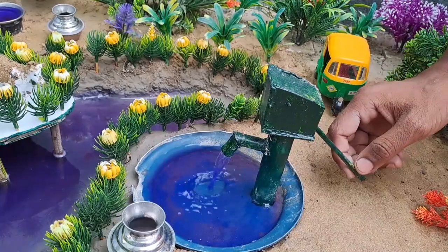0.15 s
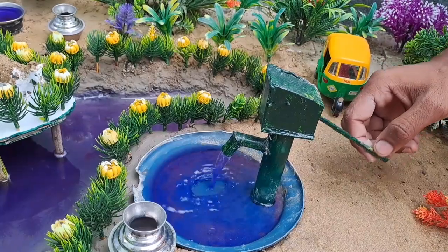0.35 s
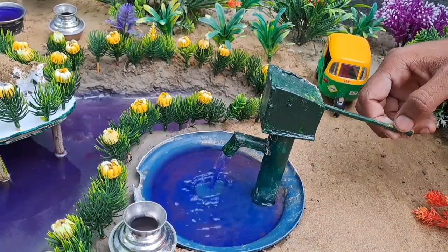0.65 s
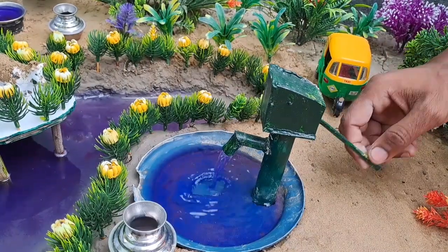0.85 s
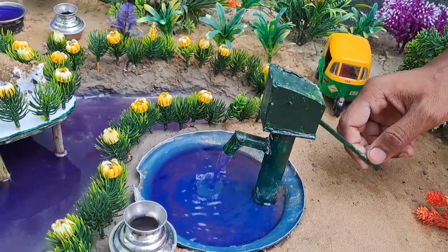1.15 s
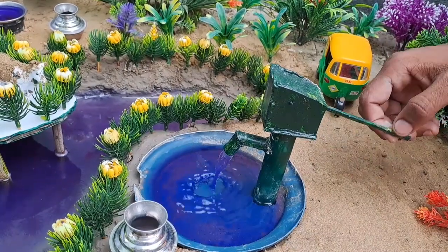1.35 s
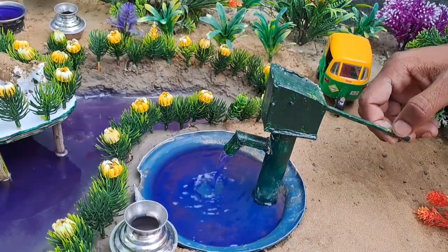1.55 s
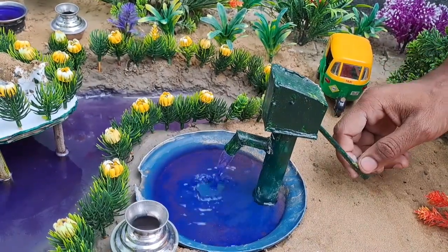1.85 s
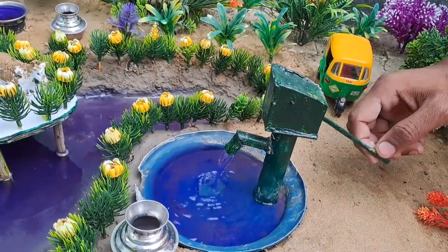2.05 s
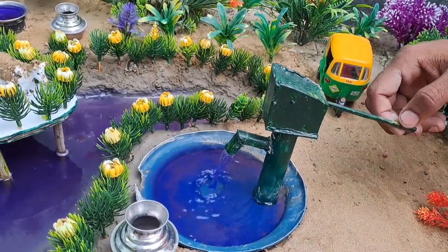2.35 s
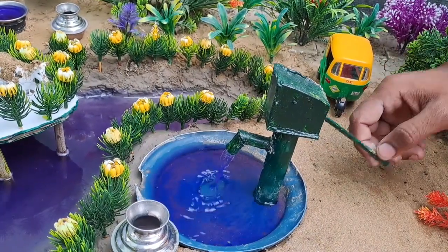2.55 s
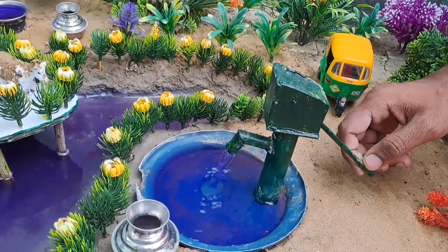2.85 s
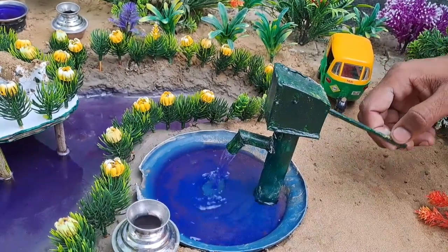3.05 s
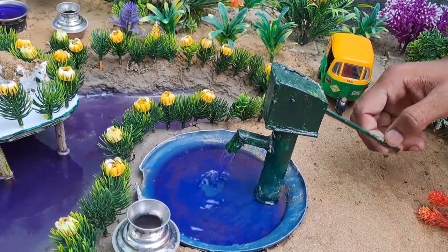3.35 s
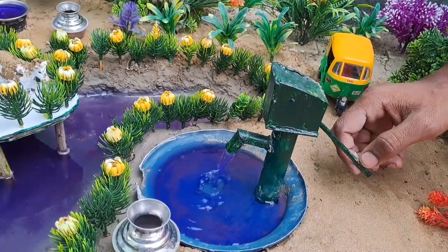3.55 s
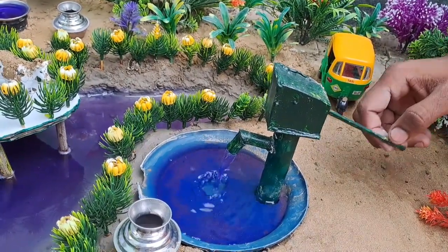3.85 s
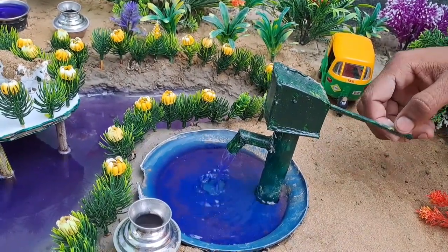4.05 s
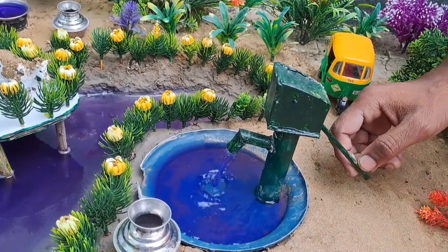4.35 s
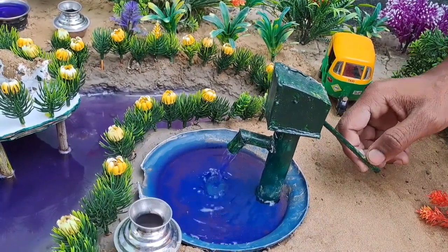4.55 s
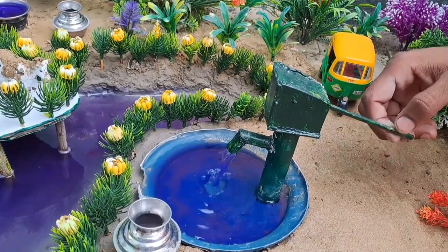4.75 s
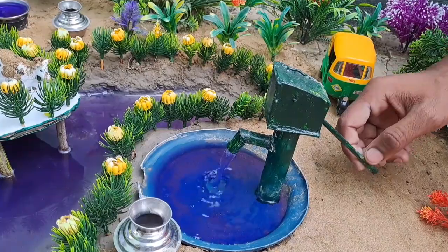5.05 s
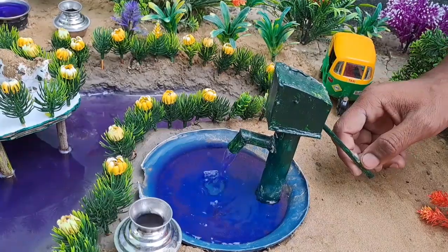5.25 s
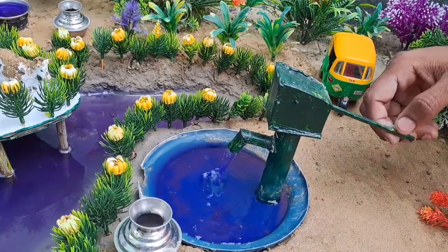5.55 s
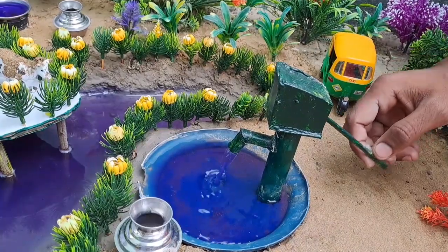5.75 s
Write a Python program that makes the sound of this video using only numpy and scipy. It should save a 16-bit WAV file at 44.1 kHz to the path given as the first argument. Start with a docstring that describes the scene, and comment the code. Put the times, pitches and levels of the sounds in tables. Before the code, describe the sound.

Close mono sound of a miniature hand pump spurting into a shallow basin of water. Roughly every second a quick gush lands with a dense, bright splash, a short basin ring and a low hollow gurgle, then thins to dribbling and burbling. Faint chirps, single fat drops and dull bumps appear. Near the end the sound drops out for an instant, then two harder, louder strokes follow.

```python
"""At a shallow basin, close by, in mono: a small hand pump spurts water about once a second.
Each stroke is noise clicks and bubble tones, filtered into a dense splash, a basin ring and a low hollow.
It thins to a dribble, over soft burbling, low rumble and bumps, with thin chirps and fat single drops.
The sound cuts out for a moment before the last two strokes, which are harder."""
import sys
import numpy as np
from scipy import signal
from scipy.fft import rfft, irfft
from scipy.io import wavfile
from scipy.ndimage import uniform_filter1d, map_coordinates

SR = 44100
rng = np.random.default_rng(int(sys.argv[2]) if len(sys.argv) > 2 else 0)


def inscribe(sig):
    """Save sig as 16-bit PCM at rate SR to the path in sys.argv[1].

    A 1-D sig is mono; a 2-D sig holds one channel per row.
    Samples are clipped to [-1, 1] before scaling.
    """
    pcm = np.round(np.clip(np.atleast_2d(sig).T, -1, 1) * 32767)
    wavfile.write(sys.argv[1], SR, pcm.astype(np.int16))


N = 260631
TIME = np.arange(N) / SR
BINS = np.fft.rfftfreq(16384, 1 / SR)

# All table levels are relative: each layer is balanced further on.
# Strokes of the handle, the first already under way: (t/s, gush level/dB, gush hold/s, dribble level/dB,
# spray slap level/dB, basin ring level/dB, hollow gurgle level/dB, hollow opening time/s)
PUMP_STROKES = [(-.55, -24.5, .045, -32, -25, -26, -21.5, .04),
                (0.386, -20, 0.041, -33.5, -21, -29.5, -28.5, 0.017),
                (1.282, -21, 0.043, -32.5, -24.5, -29, -27.5, 0.022),
                (2.223, -19.5, 0.045, -32, -22, -27.5, -27.5, 0.02),
                (3.179, -22, 0.092, -32, -24.5, -28, -27.5, 0.078),
                (4.131, -21.5, .045, -35.5, -24.5, -30, -29.5, .04),
                (4.765, -18.5, 0.15, -27.5, -17.5, -25, -22, 0.054),
                (5.6, -17, 0.098, -33.5, -23.5, -26, -21.5, 0.021)]
# Lumps of water that break out of the stream: (start t/s, time to peak/s, splash level/dB, spray level/dB)
WATER_SLUGS = [(.09, .01, -30.5, -45), (.465, 0.013, -27.5, -32), (.515, .012, -28.5, -31.5),
               (.628, .013, -28.5, -35), (1.195, .025, -39.5, -56), (1.345, .014, -22.5, -36),
               (1.504, 0.026, -27.5, -34.5), (1.93, 0.014, -39.5, -43), (2.193, .007, -39, -33),
               (2.367, .012, -24, -41), (2.453, .014, -25.5, -32), (2.644, .02, -30.5, -54),
               (2.737, .009, -30, -34), (3.144, 0.012, -36.5, -36.5), (3.428, .017, -24.5, -33),
               (3.572, 0.022, -28.5, -44), (3.733, 0.016, -28.5, -41), (4.078, .012, -39, -37),
               (4.358, 0.015, -29.5, -39), (4.527, 0.013, -30, -46.5), (4.791, 0.023, -18, -23.5),
               (4.821, 0.02, -15.5, -27.5), (4.901, 0.017, -22, -25), (5.025, 0.036, -25, -32),
               (5.152, 0.008, -24.5, -36), (5.313, 0.034, -24.5, -34), (5.371, 0.027, -24, -35.5),
               (5.644, .016, -13.5, -23), (5.729, .016, -21, -32), (5.87, .012, -32.5, -30.5)]
# Gulps of trapped air that set the basin ringing: (peak t/s, level/dB)
AIR_GULPS = [(.03, -38), (.105, -45), (.19, -35), (.495, -21), (.678, -27), (.868, -35), (.94, -36),
             (1.038, -34.5), (1.375, -29), (1.585, -29), (1.8, -29), (1.945, -41), (2.384, -25.5),
             (2.869, -32.5), (3.235, -28), (3.593, -29), (3.755, -30.5), (4.236, -22.5), (4.416, -24),
             (4.857, -14), (5.065, -25), (5.168, -31), (5.37, -26.5), (5.433, -26), (5.667, -14)]
# Deep glugs of the hollow: (peak t/s, half length/s, level/dB)
HOLLOW_GLUGS = [(.44, 0.033, -23.5), (.515, 0.02, -25), (.72, 0.014, -27.5), (1.248, 0.047, -31.5),
                (1.675, 0.013, -22), (2.275, .02, -29), (2.335, 0.022, -39), (2.45, .028, -31.5),
                (2.792, .025, -34), (3.298, 0.034, -23.5), (3.377, 0.031, -26), (3.55, .025, -30),
                (3.635, 0.038, -36), (4.117, 0.017, -26), (4.245, 0.029, -24.5), (4.55, .025, -33),
                (4.84, 0.021, -23), (4.955, 0.022, -24), (5.197, 0.021, -22.5), (5.865, 0.014, -20)]
# Wall resonances of the basin: (f/Hz, width/Hz, lift on easy strokes/dB, lift on hard strokes/dB)
BASIN_WALLS = [(793, 200, 12, 21.5), (1195, 13, 3, 18.5), (1328, 44, -2.5, 12.5), (1805, 13, 12, -23),
               (2087, 93, 0.5, 7), (2210, 61, 7.5, 12.5), (2332, 45, 5.5, 8.5), (2570, 33, 10.5, -10),
               (2930, 11, 13, -44), (3467, 70, 1.5, 7), (4694, 81, 4, 10)]
# The basin's main ring: (f/Hz, width/Hz, level/dB)
BASIN_RING = [(1488.4, 74, 3.5), (1462, 140, 9.5), (1620, 85, 2)]
# The basin's low body: (f/Hz, width/Hz, level/dB)
BASIN_BODY = [(311.6, 40, -9), (451.4, 80, 0.5), (535, 51, -3.5)]
# The hollow under the stream: (f/Hz, width/Hz, level/dB)
HOLLOW_MODES = [(238.4, 23.8, -3), (291, 130, -18.5)]
# Colour of the splash: (f/Hz, level/dB)
SPLASH_COLOUR = [(300, -28), (650, -24.5), (1000, -11), (1300, -8), (1800, -1), (2650, 1.5), (3300, 0),
                 (4500, -4), (5500, -7.5), (6500, -15), (8500, -17), (16000, -25.5)]
# Colour of the spray: (f/Hz, level/dB)
SPRAY_COLOUR = [(2500, -34), (5000, 5.5), (6600, 4), (7900, -1), (8600, -5.5), (11000, -5), (12400, -1.5),
                (13800, -10), (15500, -20.5), (16500, -18)]
# Extra top end of the spray when single drops fall: (f/Hz, level/dB)
CRISP_LIFT = [(4000, -17.5), (8000, -7.5), (12000, -6), (14500, 4.5), (16000, 8.5)]
# Colour of the rumble and the bumps: (f/Hz, level/dB)
RUMBLE_COLOUR = [(15, -34.5), (30, -16), (48, 6), (90, 0), (130, -6.5), (190, -22), (300, -51.5)]
# Swell of the low rumble: (t/s, level/dB)
RUMBLE_SWELL = [(0, -52.5), (1.3, -49), (2.8, -54.5), (3.9, -45), (4.6, -46), (5.9, -35.5)]
# Dull bumps as the hand rocks the pump: (t/s, peak level/dB)
PUMP_BUMPS = [(0.128, -38), (0.53, -33), (0.657, -35), (1.349, -29.5), (2.298, -41), (3.142, -37),
              (3.79, -34.5), (4.279, -35), (4.86, -35), (5.366, -30), (5.779, -31), (5.875, -29)]
# Thin chirps at the pump: (t/s, level/dB, f/Hz, length/s, glide as a share of the pitch)
PUMP_CHIRPS = [(0.139, -28.5, 5260, 0.021, -0.03), (0.177, -35, 5170, 0.044, .03),
               (0.987, -40, 5000, 0.069, -0.042), (1.085, -48.5, 5400, 0.066, -0.043),
               (5.151, -21, 4694, 0.033, -0.0032), (5.421, -27.5, 8700, 0.017, -0.0024)]
# Fat drops and splats: (t/s, peak level/dB, decay/s)
FAT_DROPS = [(.142, -17.5, 0.0034), (.632, -30, 0.0058), (.835, -19, 0.0022), (1.903, -20, .0015),
             (2.913, -8, 0.0014), (3.002, -16, .002), (3.432, -14, 0.0034), (3.736, -15, 0.0092),
             (5.152, -9.5, 0.017)]
# Moment when the sound is cut out: (start t/s, end t/s)
DROPOUT = (4.633, 4.762)

# The gush sets in, holds and falls away; the dribble outlasts it until the spout runs dry.
ATTACK_S, GUSH_FALL_DB_PER_S = .007, 55.5
# The dry fall comes on top of the ordinary fall.
DRIBBLE_FALL_DB_PER_S, DRY_AFTER_S, DRY_FALL_DB_PER_S = 6, 0.73, 27.5
# Spray: a slap as the gush lands, then a mist that grows more slowly than the flow.
SLAP_ATTACK_S, SLAP_FALL_DB_PER_S = 0.0082, 199
MIST_DB, MIST_GROWTH = -40, 0.43  # level at the rms flow, exponent
# The basin's ring builds up under each gush and dies as the spout runs dry.
RING_RISE_S, RING_FALL_DB_PER_S, RING_DRY_DB_PER_S = 0.031, 16, 47.5
HOLLOW_FALL_DB_PER_S = 15  # the hollow slowly closes after each gush
GULP_HALF_S = .019
# The stream thins while each slug or gush gathers: time before it lands, half length, depth.
GATHER_S, GATHER_HALF_S, GATHER_DB = 0.0092, 0.015, -1.5
EDGE_HZ = 15600  # upper band limit


def amp(db):
    """Decibels to gain."""
    return 10 ** (np.asarray(db) / 20)


def evened(x):
    """Scales to rms 1."""
    return x / np.sqrt(np.mean(x ** 2) + 1e-20)


def steadied(x, seconds):
    """Holds the rms near 1 over the given time and leaves faster flutter alone."""
    size = max(int(seconds * SR), 2)
    power = uniform_filter1d(uniform_filter1d(x ** 2, size), size)
    return x / np.sqrt(abs(power) + 1e-12)


def level(curve):
    """A dB curve as a gain for every sample."""
    return amp(np.interp(TIME, *np.transpose(curve)))


def read(points):
    """A spectrum in dB on the frequency bins."""
    hz, db = np.transpose(points)
    return np.interp(np.log(BINS + 1), np.log(hz), db)


def peak(hz, width):
    """Power response of one resonance."""
    return 1 / (1 + (2 * (BINS - hz) / width) ** 2)


def resonances(modes):
    """Spectrum in dB of a few steep-sided resonances."""
    power = sum((amp(db) * peak(hz, width)) ** 2 for hz, width, db in modes)
    return 10 * np.log10(power)


def ring(x, db):
    """Causal, minimum-phase filter with the given spectrum: every click rings on after it lands."""
    log_gain = np.log(amp(np.maximum(db - db.max(), -90)))
    circle = np.concatenate([log_gain, log_gain[-2:0:-1]])
    response = np.fft.ifft(np.exp(np.conj(signal.hilbert(circle)))).real
    return signal.oaconvolve(x, response[:len(BINS) // 2])[:len(x)]


def wander(hz):
    """Smooth chance of rms 1, mostly slower than the given rate."""
    f = np.fft.rfftfreq(N, 1 / SR)
    spectrum = rfft(rng.standard_normal(N)) / (1 + (f / hz) ** 2)
    return evened(irfft(spectrum, N))


def add(mix, s, sound):
    """Adds a sound at a time."""
    part = mix[max(round(s * SR), 0):][:len(sound)]
    part += sound[:len(part)]


def slosh(x, depth_s, rate_hz):
    """Moving water bends a sound's pitch slightly up and down by a wandering delay."""
    warped = TIME + depth_s * wander(rate_hz)
    return map_coordinates(x, [warped * SR], order=3, mode="reflect")


def mottled(x, patchy_db, count, size):
    """Each little splash has its own colour: brief random patches of louder and softer pitch."""
    _, _, z = signal.stft(x, SR, nperseg=512, noverlap=384)
    patches = rng.standard_normal(z.shape[::-1])  # frames by bins
    patches = uniform_filter1d(patches, count, axis=0)
    patches = evened(uniform_filter1d(patches, size, axis=1)).T
    gain = evened(amp(patchy_db * patches))
    return signal.istft(z * gain, SR, nperseg=512, noverlap=384)[1][:N]


def drop_sizes(spread_db):
    """Random gains for every sample: mostly small, now and then large."""
    return amp(spread_db * np.minimum(rng.exponential(1, N), 4))


def spurt(start, db, attack_s, hold_s, fall_db_per_s, dry_db_per_s):
    """Power over one stroke: it rises, holds and falls, with an extra fall once the spout runs dry."""
    age = np.maximum(TIME - start, 0)
    fallen = fall_db_per_s * np.maximum(age - hold_s, 0)
    fallen = fallen + dry_db_per_s * np.maximum(age - DRY_AFTER_S, 0)
    return (np.minimum(age / attack_s, 1) * amp(db - np.minimum(fallen, 200))) ** 2


def swell(s, half_s, db):
    """Power of one brief, rounded surge."""
    return amp(db) ** 2 * np.exp(-np.minimum(((TIME - s) / half_s) ** 2, 100))


def slug(start, peak_s, db):
    """Power of a lump of water landing: a quick start and a softer end."""
    u = np.clip((TIME - start) / peak_s, 0, 10)
    return (amp(db) * u) ** 2 * np.exp(1 - u ** 2)


def pumping():
    """Gains of flow, spray, basin ring and hollow: powers of strokes, slugs, gulps and glugs add up."""
    flow, spray, ringing, gurgle = np.zeros((4, N))
    for s, gush_db, hold_s, dribble_db, slap_db, ring_db, gurgle_db, open_s in PUMP_STROKES:
        flow *= amp(GATHER_DB * swell(s - GATHER_S, GATHER_HALF_S, 0)) ** 2
        flow += spurt(s, gush_db, ATTACK_S, hold_s, GUSH_FALL_DB_PER_S, 0)
        flow += spurt(s, dribble_db, ATTACK_S, 0, DRIBBLE_FALL_DB_PER_S, DRY_FALL_DB_PER_S)
        spray += spurt(s, slap_db, SLAP_ATTACK_S, 0, SLAP_FALL_DB_PER_S, 0)
        ringing += spurt(s, ring_db, RING_RISE_S, 0, RING_FALL_DB_PER_S, RING_DRY_DB_PER_S)
        gurgle += spurt(s, gurgle_db, open_s, 0, HOLLOW_FALL_DB_PER_S, 0)
    gathering = sum(swell(s - GATHER_S, GATHER_HALF_S, 0) for s, *_ in WATER_SLUGS)
    flow *= amp(GATHER_DB * gathering) ** 2
    spray += (amp(MIST_DB) * evened(np.sqrt(flow)) ** MIST_GROWTH) ** 2
    for s, peak_s, splash_db, spray_db in WATER_SLUGS:
        flow += slug(s, peak_s, splash_db)
        spray += slug(s, peak_s, spray_db)
    ringing += sum(swell(s, GULP_HALF_S, db) for s, db in AIR_GULPS)
    gurgle += sum(swell(*glug) for glug in HOLLOW_GLUGS)
    return np.sqrt([flow, spray, ringing, gurgle])


def patter(per_s, spread_db, burst_s, mist):
    """Drops of random size land at random; each breaks into a burst of tiny clicks over a thin mist."""
    size = drop_sizes(spread_db) * (rng.random(N) < per_s / SR)
    power = signal.lfilter([1], [1, -np.exp(-1 / (burst_s * SR))], size ** 2)
    power = power / (uniform_filter1d(power, size=8000) + 1e-9)
    return np.sqrt(abs(power) + abs(mist)) * rng.standard_normal(N)


def froth(per_s, low_hz, high_hz, cycles, spread_db, count):
    """Bubbles of many sizes, each a short dying tone that rises in pitch."""
    born = np.flatnonzero(rng.random(N) < per_s / SR)
    size = drop_sizes(spread_db)[born]
    kind = rng.integers(0, count, N)[born]
    out = np.zeros(N)
    for k, hz in enumerate(np.geomspace(low_hz, high_hz, count)):
        age = np.arange(0, 5, hz / (cycles * SR))  # in decay times
        tone = np.sin(2 * np.pi * cycles * age * (1 + 0.018 * age))
        tone = tone * np.exp(-age) * np.sqrt(hz / low_hz)
        for at, height in zip(born[kind == k], size[kind == k]):
            add(out, at / SR, height * tone)
    return out


def splash(impacts, droplets, density):
    """Impacts and bubbles excite the basin walls; strokes after the dropout excite them harder."""
    bubbles = steadied(froth(1800 * density, 1075.4, 6600, cycles=8, spread_db=1.5, count=60), 0.16)
    drive = mottled(impacts + .3 * droplets + .6 * bubbles, patchy_db=2.2, count=8, size=4)
    colour = read(SPLASH_COLOUR)
    easy = colour + sum(db * peak(hz, width) for hz, width, db, _ in BASIN_WALLS)
    hard = colour + sum(db * peak(hz, width) for hz, width, _, db in BASIN_WALLS)
    both = np.where(TIME < DROPOUT[1], ring(drive, easy), ring(drive, hard))
    return amp(-1.14) * steadied(both, 0.038)


def churn(flow):
    """Only a full spurt churns up a thick cloud of bubbles."""
    cloud = steadied(froth(3500, 2150, 2900, cycles=6.4, spread_db=1, count=24), 0.023)
    return amp(-10) * np.minimum(flow / amp(-20), 1) * cloud


def spatter(droplets, density):
    """Fine droplets and fizz; a thin dribble sprays more crisply than a thick gush."""
    fizz = steadied(froth(800 * density, 4500, 15000, cycles=3.1, spread_db=0.0, count=30), .2)
    mist = mottled(droplets + .5 * fizz, patchy_db=2.5, count=6, size=9)
    soft = ring(mist, read(SPRAY_COLOUR))
    crisp = ring(mist, read(SPRAY_COLOUR) + read(CRISP_LIFT))
    return steadied(soft + 0.37 * crisp / density, 0.095)


def basin_ring(impacts):
    """Impacts ring the basin; moving water bends its pitch and the level flutters."""
    basin = slosh(ring(impacts, resonances(BASIN_RING)), depth_s=.00008, rate_hz=5.5)
    return steadied(basin, .07) * evened(amp(0.57 * wander(hz=22)))


def hollow_gurgle(impacts):
    """Impacts excite the low hollow under the stream, bent in pitch by the moving water."""
    hollow = slosh(ring(impacts, resonances(HOLLOW_MODES)), depth_s=.00035, rate_hz=6)
    return steadied(hollow, 0.059)


def stream():
    """The stream hits the basin: more flow means more drops and bubbles, and it arrives in lumps."""
    flow, spray, ringing, gurgle = pumping()
    density = evened(flow) ** 0.71
    lumps = wander(hz=45)
    impacts = patter(1300 * density, spread_db=3.0, burst_s=0.0053, mist=1.0) * amp(1.7 * lumps)
    droplets = patter(330 * density, spread_db=6.0, burst_s=.0012, mist=.17) * amp(2.2 * lumps)
    body = steadied(ring(impacts, resonances(BASIN_BODY)), 0.024)
    body = amp(-11.5) * density ** -.25 * body  # a thin flow has relatively more body
    out = flow * (splash(impacts, droplets, density) + churn(flow) + body)
    out += spray * spatter(droplets, density)
    return out + ringing * basin_ring(impacts) + gurgle * hollow_gurgle(impacts)


def burble():
    """Large, soft bubbles keep turning over in the basin, during and between strokes."""
    return amp(-44.0) * steadied(froth(380, 264, 1145, cycles=2.8, spread_db=2.0, count=30), .2)


def rumble():
    """Dull bumps of the pump, decaying low noise, over a faint low rumble."""
    bumps, t = np.zeros(N), TIME[:8192]
    for s, db in PUMP_BUMPS:
        burst = rng.standard_normal(len(t)) * np.exp(-t / 0.016)
        thud = ring(burst, read(RUMBLE_COLOUR))
        add(bumps, s, amp(db) * thud / abs(thud).max())
    bed = steadied(ring(rng.standard_normal(N), read(RUMBLE_COLOUR)), 0.15)
    return amp(3.5) * level(RUMBLE_SWELL) * bed + amp(9.5) * bumps


def chirps():
    """Short wavering whistles that swell, glide and fade."""
    out = np.zeros(N)
    for s, db, hz, length, glide in PUMP_CHIRPS:
        u = np.linspace(0, 1, int(length * SR))
        phase = 2 * np.pi * np.cumsum(hz * (1 + glide * u)) / SR
        add(out, s, amp(db) * np.sin(np.pi * u ** 0.51) * np.sin(phase))
    return slosh(out, depth_s=.00002, rate_hz=99)


def drips():
    """Fat drops smack the surface; the longer the splat, the more body it has."""
    smacks, t = np.zeros(N), TIME[:8192]
    for s, db, decay in FAT_DROPS:
        burst = rng.standard_normal(len(t)) * (1 - np.exp(-t / 0.00011)) * np.exp(-t / decay)
        smack = ring(burst, read(SPRAY_COLOUR))
        smack = smack + decay / 0.0079 * ring(burst, read(SPLASH_COLOUR))
        add(smacks, s, amp(db) * smack / abs(smack).max())
    return amp(-7.0) * smacks


def surroundings(x, t60, wet_db, count):
    """A short scatter off the rippling water and nearby surfaces; the paths keep changing."""
    t, wet = TIME[:SR // 4], np.zeros(N)
    shares = np.array([wander(hz=3.1) for _ in range(count)])
    for share in shares / np.linalg.norm(shares, axis=0):
        decay = np.exp(-np.log(1000) * t / t60)
        tail = rng.standard_normal(len(t)) * decay * (t > .002)
        wet += signal.oaconvolve(x * share, tail / np.linalg.norm(tail))[:N]
    return x + amp(wet_db) * wet


def scene():
    """Stream, burble, chirps and drips with their scatter, plus dry rumble, in one channel."""
    water = stream() + burble() + chirps() + drips()
    return (surroundings(water, t60=0.052, wet_db=-7.0, count=5) + rumble())[None]


def record(dry):
    """At the microphone: the sound cuts out briefly; full-scale peaks flatten; then the band limit."""
    live = (TIME < DROPOUT[0]) | (TIME > DROPOUT[1])
    cut = np.clip(dry * uniform_filter1d(live * 1., size=40), -1, 1)
    lowpass = signal.firwin(255, EDGE_HZ, window=("kaiser", 9), fs=SR)
    return signal.oaconvolve(cut, lowpass[None], "same")


dry = scene()
out = record(dry)
inscribe(out)
```